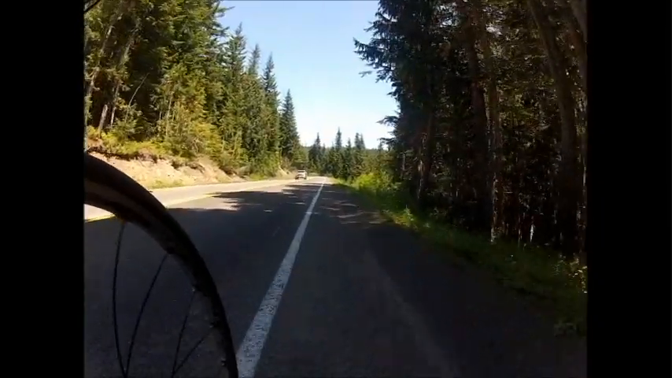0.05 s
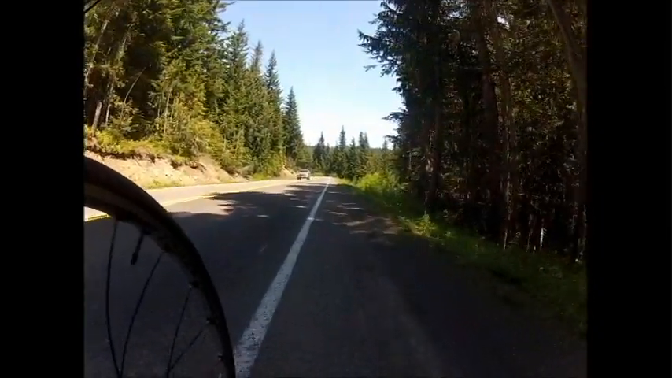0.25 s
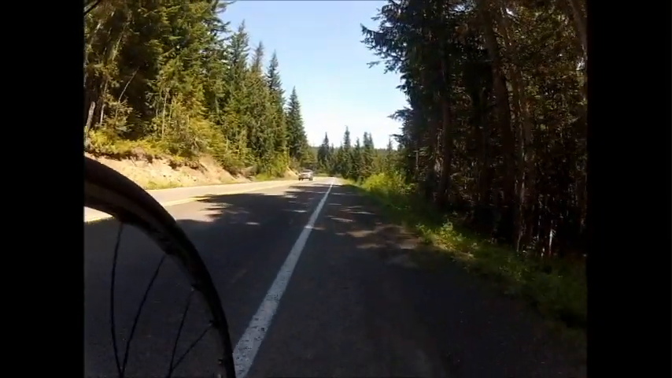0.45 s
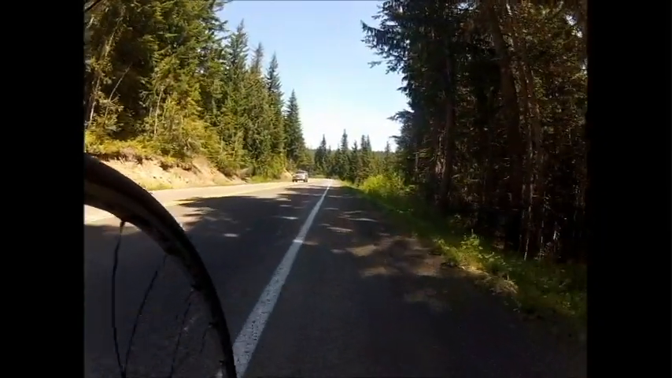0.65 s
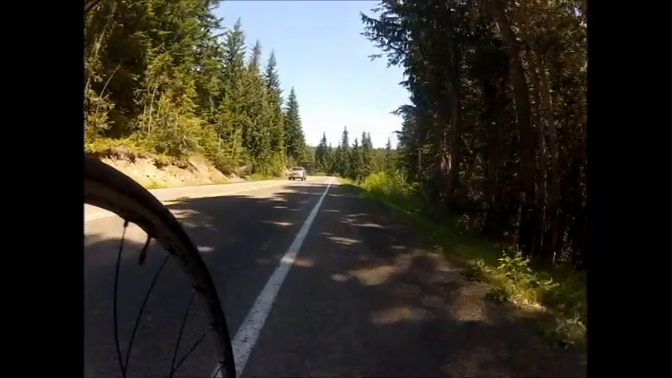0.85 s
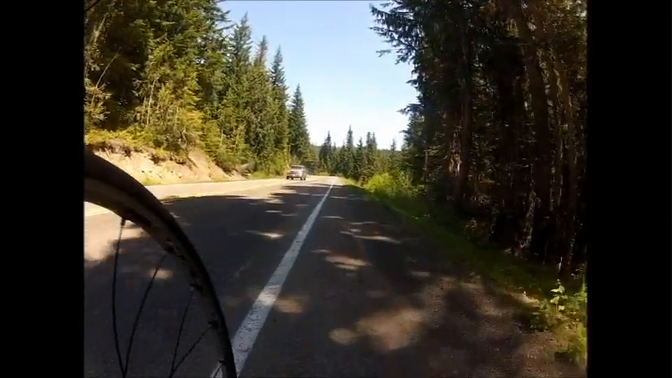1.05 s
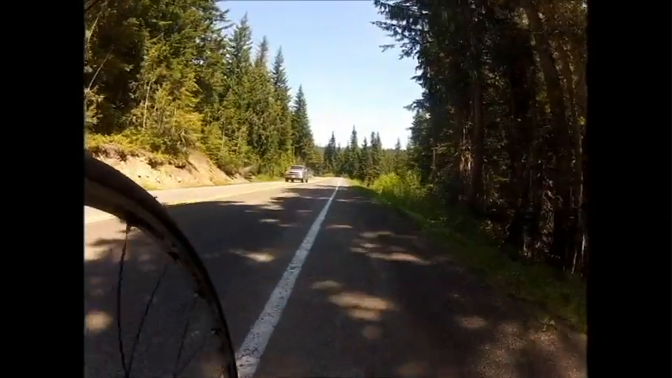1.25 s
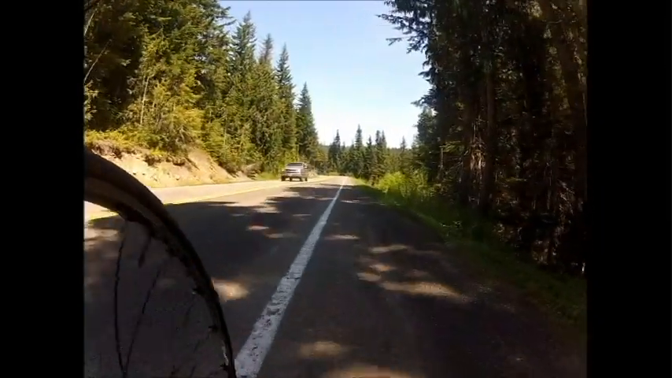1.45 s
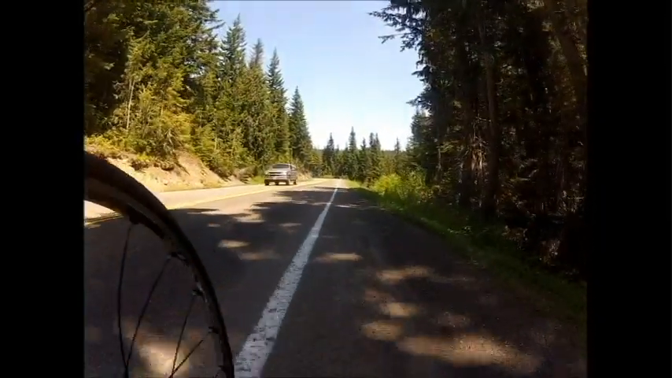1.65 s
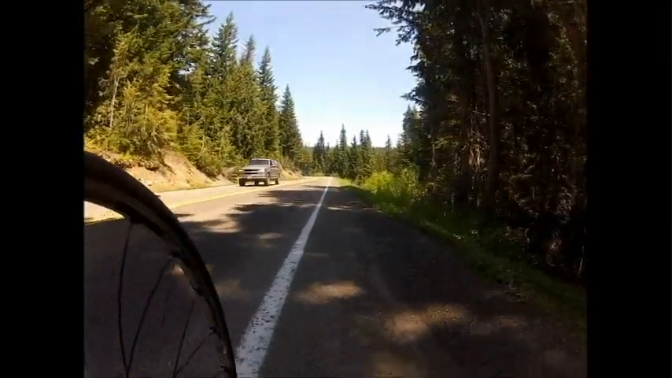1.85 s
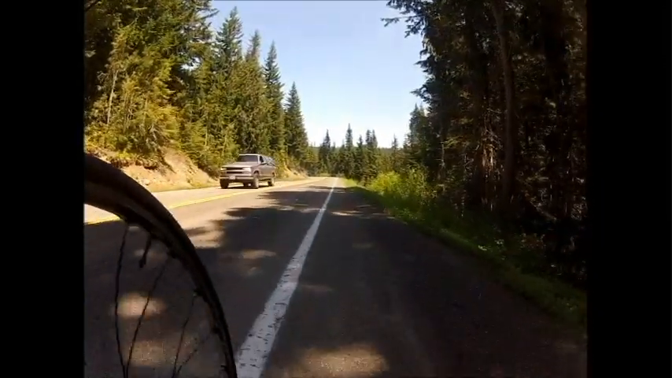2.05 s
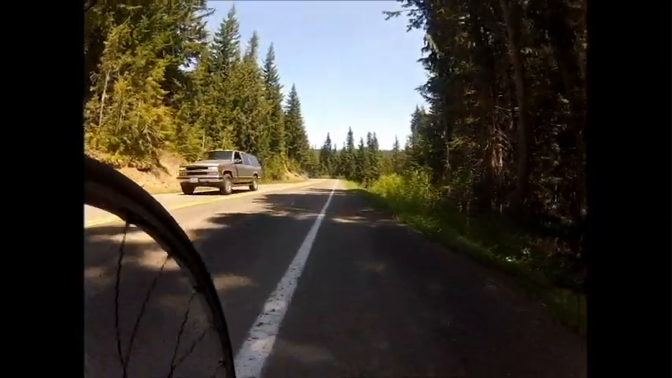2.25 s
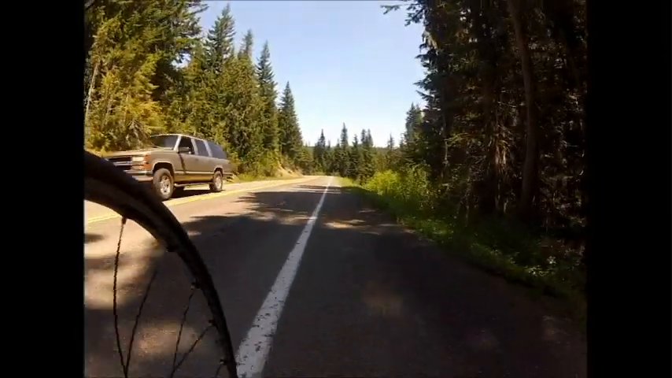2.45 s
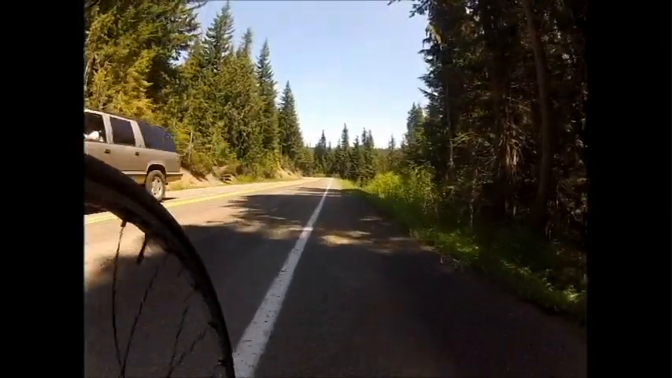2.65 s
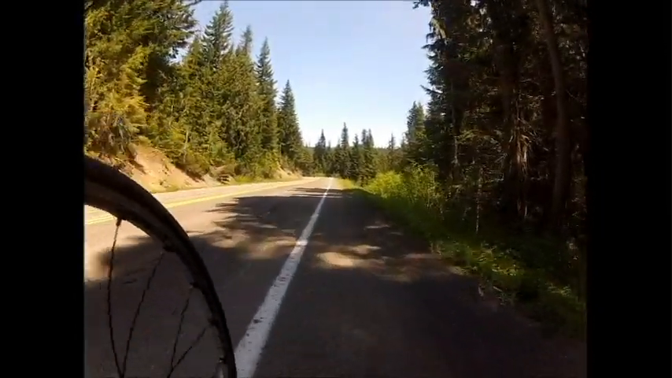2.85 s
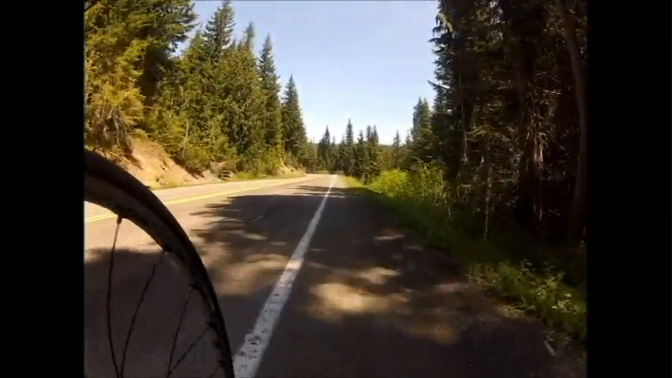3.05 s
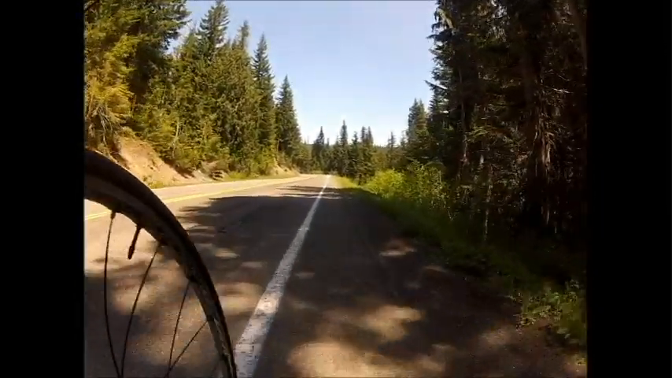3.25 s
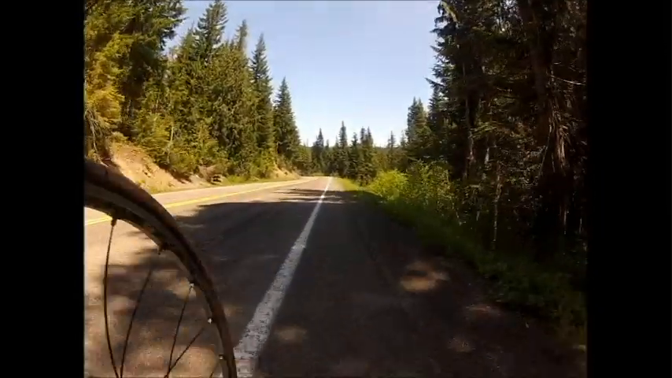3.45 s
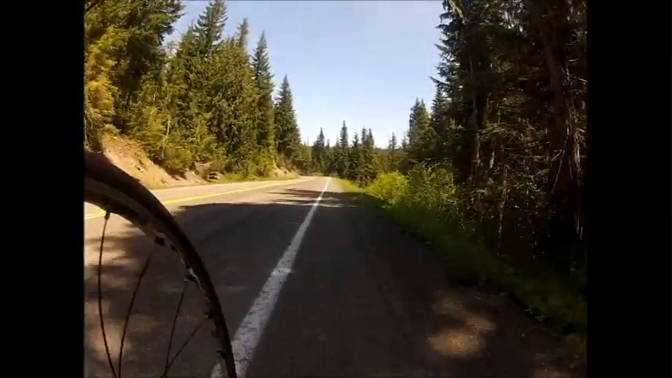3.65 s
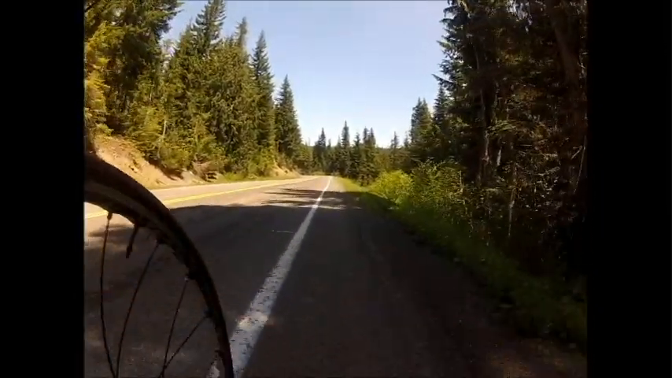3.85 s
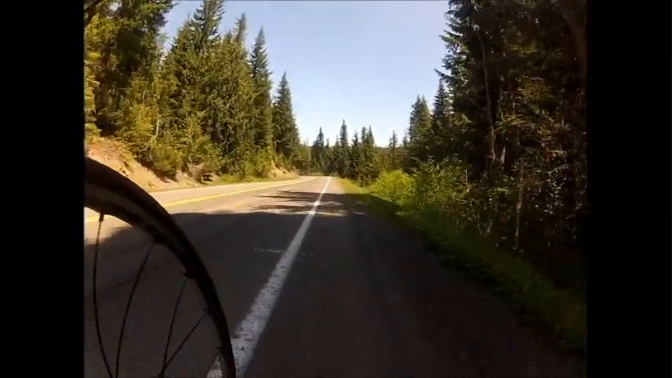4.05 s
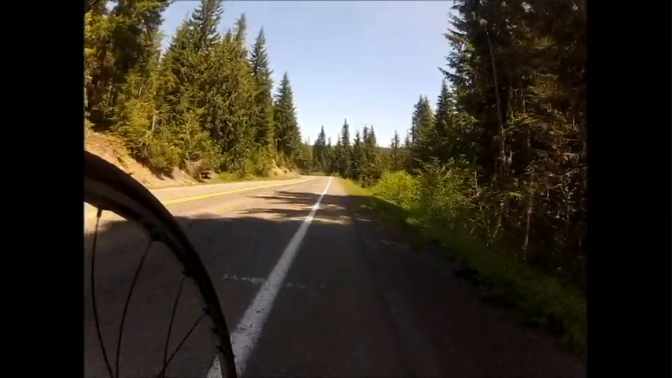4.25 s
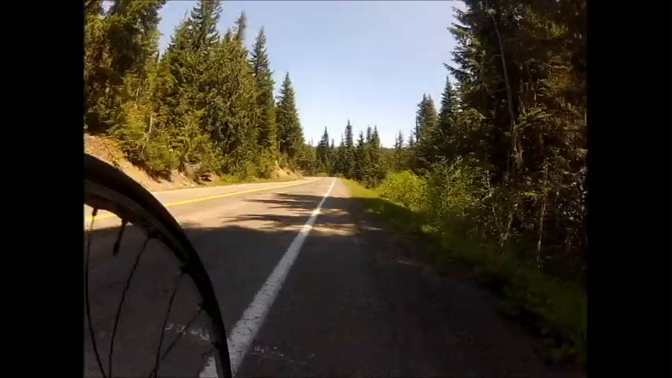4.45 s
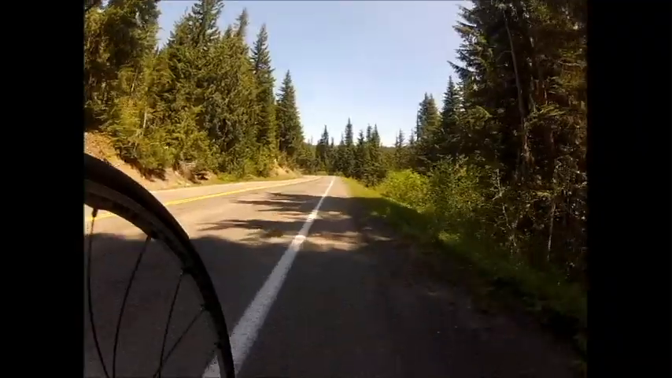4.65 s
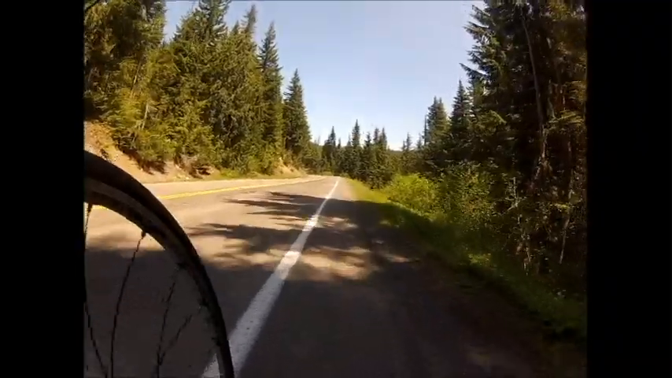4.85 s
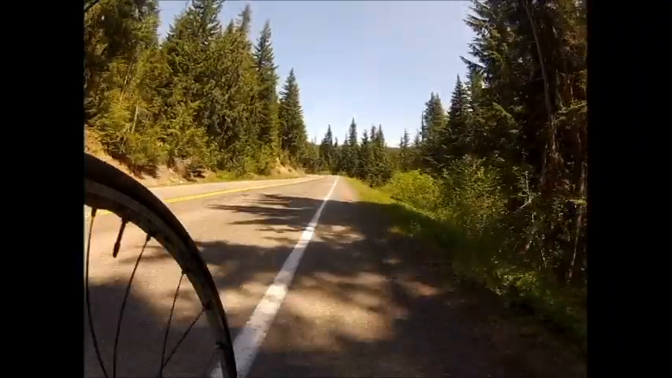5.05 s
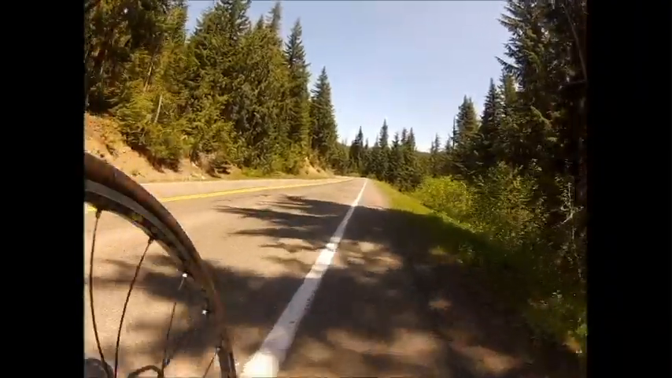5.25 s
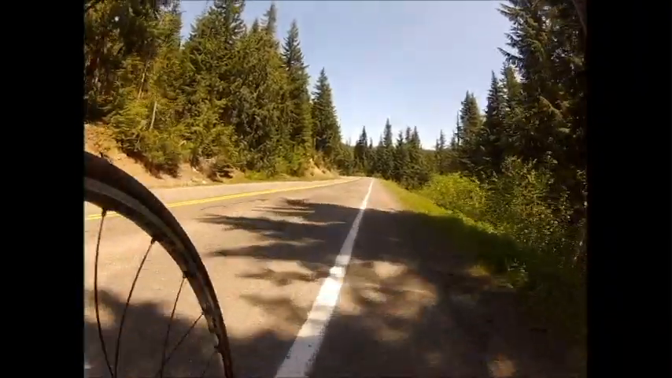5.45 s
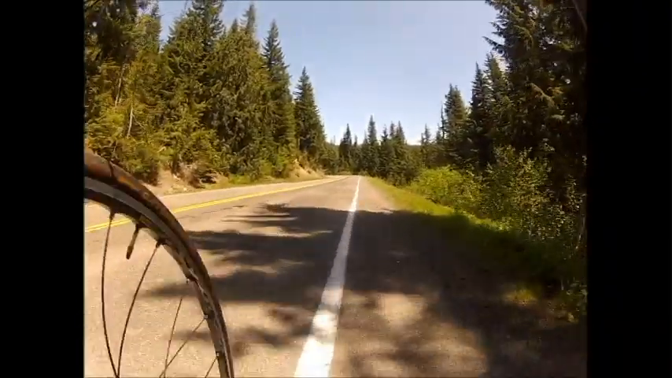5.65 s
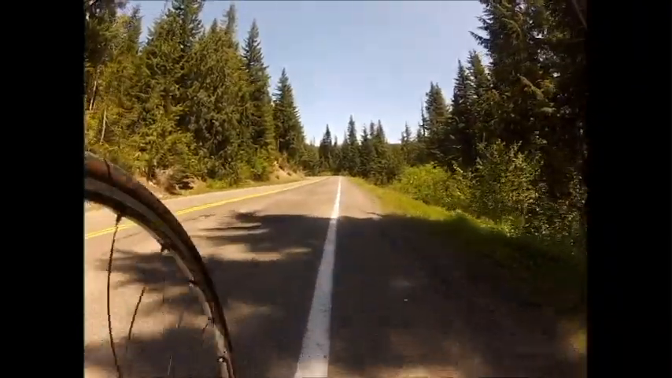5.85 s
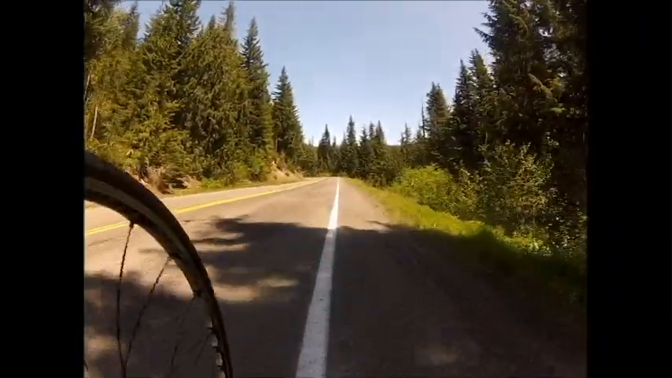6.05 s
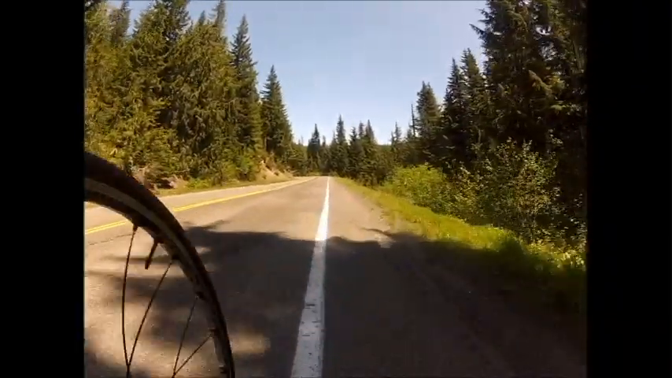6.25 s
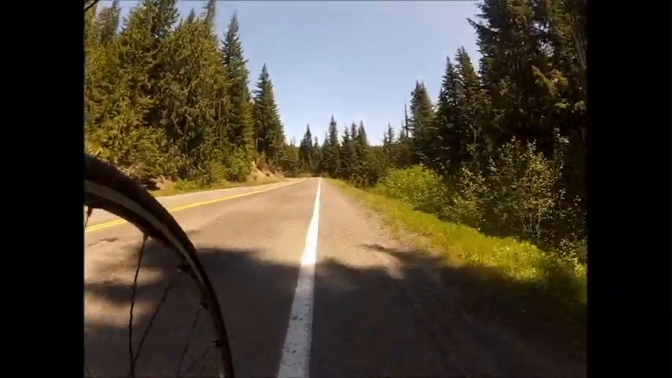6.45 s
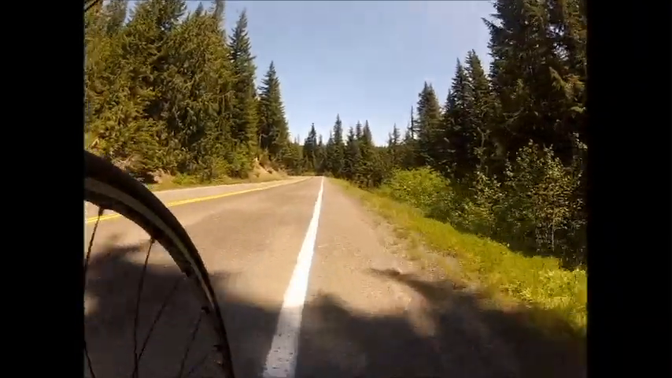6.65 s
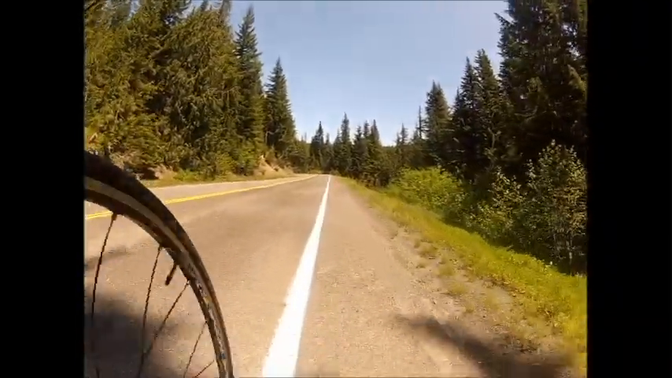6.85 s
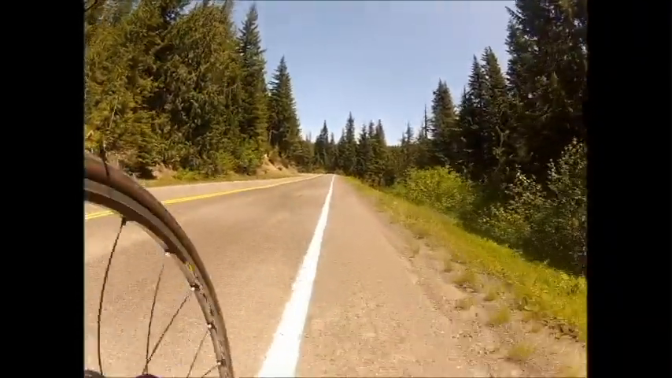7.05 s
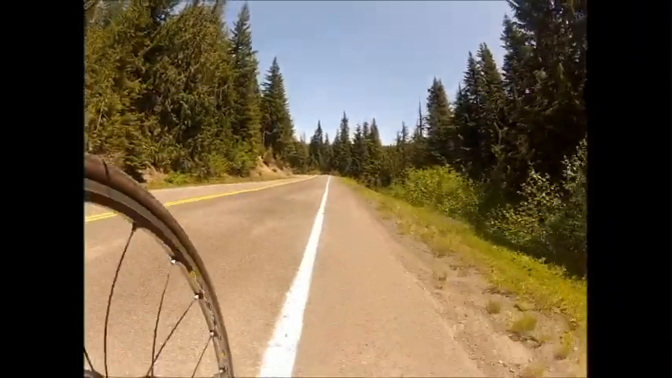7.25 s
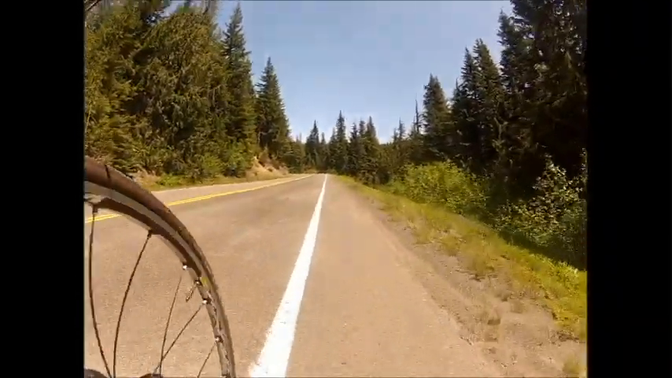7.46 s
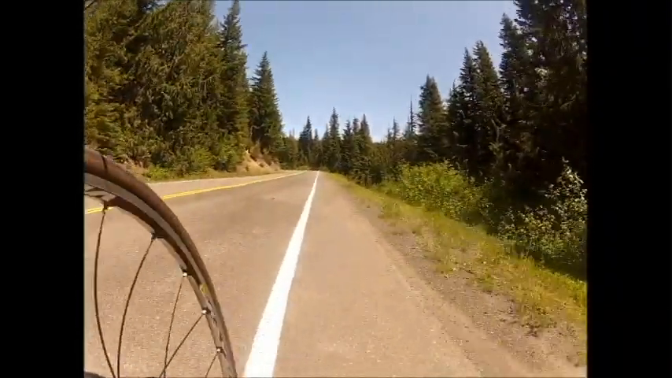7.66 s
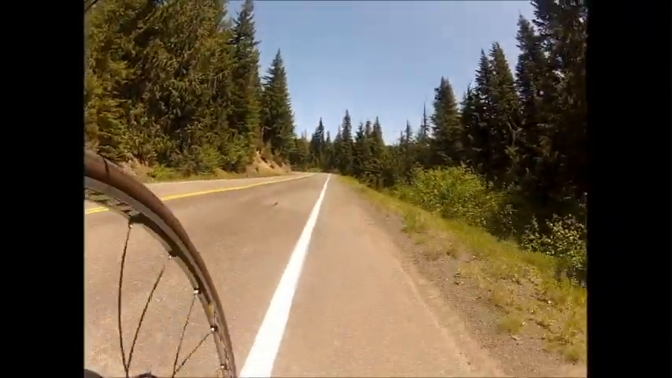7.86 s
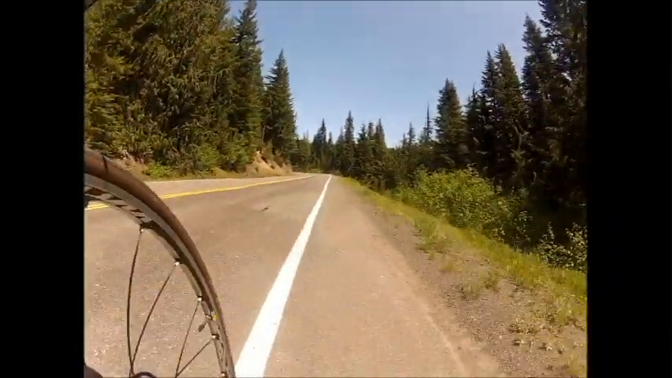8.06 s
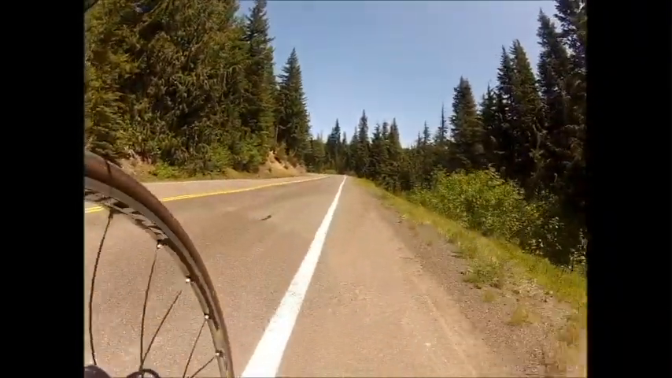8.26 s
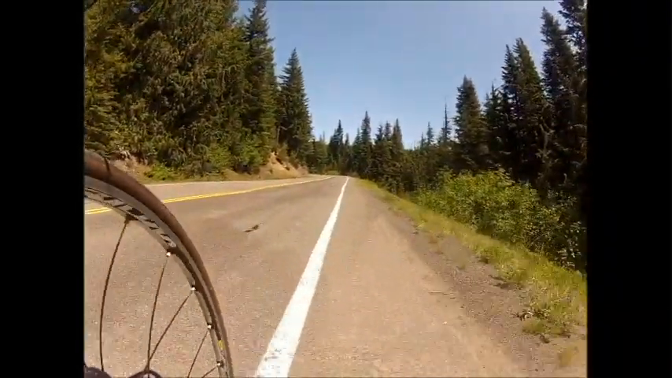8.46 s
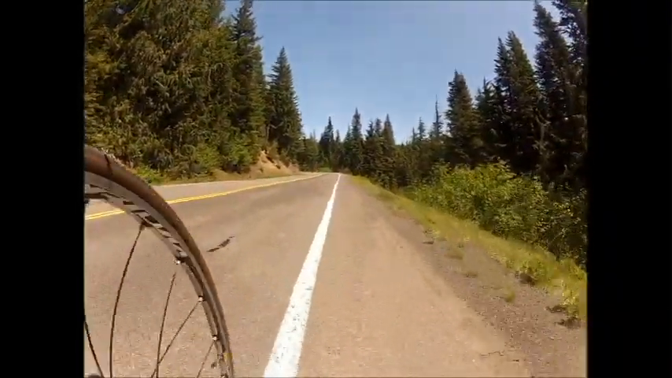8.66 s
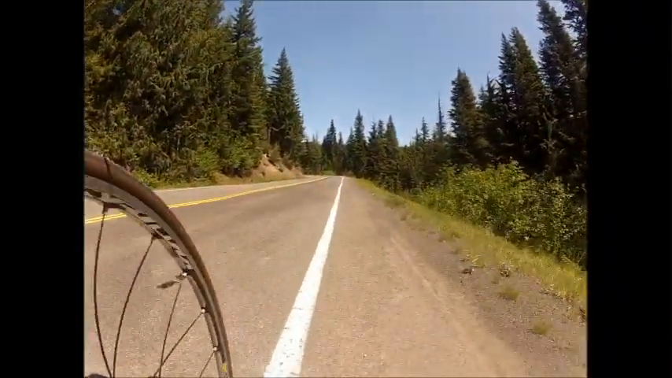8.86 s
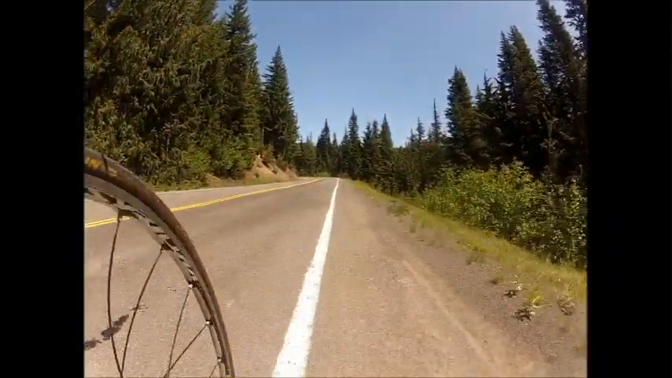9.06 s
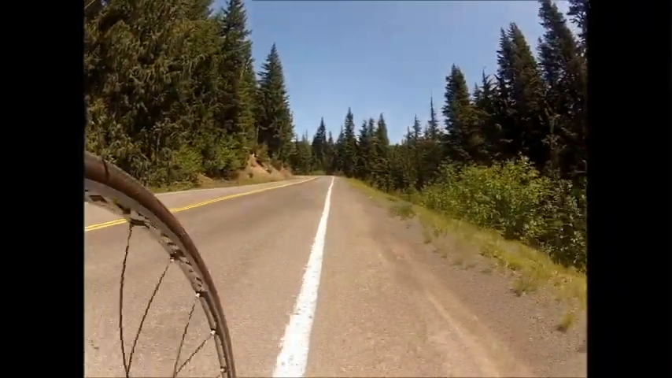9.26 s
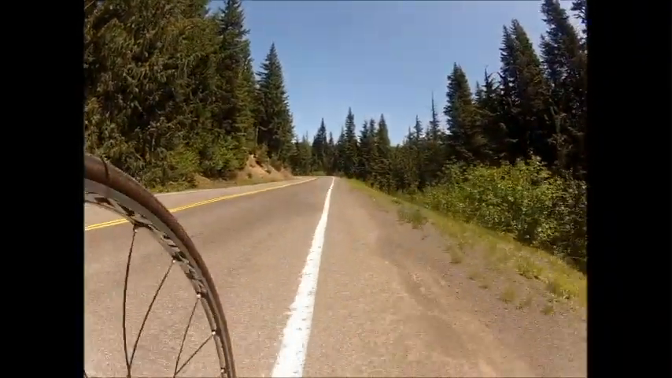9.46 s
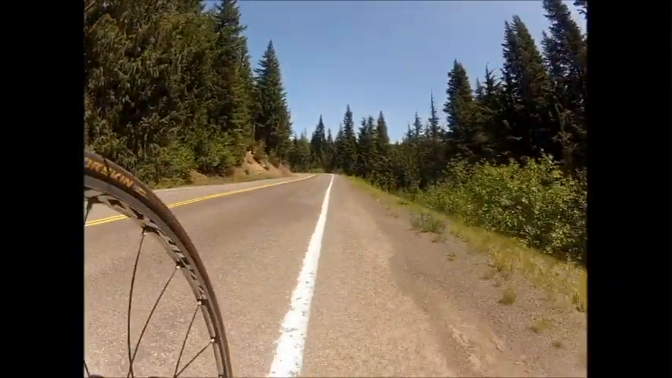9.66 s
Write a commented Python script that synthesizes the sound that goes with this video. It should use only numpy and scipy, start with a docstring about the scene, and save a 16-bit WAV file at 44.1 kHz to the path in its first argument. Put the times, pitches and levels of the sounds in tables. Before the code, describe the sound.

A bicycle rides over asphalt outdoors, heard through its own frame. Dull rumble and patter continue under loose metallic chatter, ticks and small clanks. First a car approaches, passes with a brief low whoosh and recedes. After a steadier stretch, a sharp triple jolt slams the bike, loudest in the middle, then quieter rolling and rattling resume. The tone is boxy, with a gritty treble edge.

```python
"""Bicycle climbing an asphalt road

Heard by one microphone in a closed case clamped to the frame. Noise through resonances makes the frame hum;
shaped noise makes the broad roar. Blows excite short tones and noise bursts in the case, loose parts and mount.
A car passes the other way as distance-faded noise with Doppler-shifted peaks, and a thin rub chirrs once.
A coarse sampler holds each sample, so the whole sound is mirrored into the treble."""
import sys
import numpy as np
from scipy import signal
from scipy.fft import rfft, irfft, next_fast_len
from scipy.io import wavfile
from scipy.ndimage import map_coordinates

SR = 44100
rng = np.random.default_rng(int(sys.argv[2]) if len(sys.argv) > 2 else 0)


def int16_out(signal):
    """Quantize to a 16-bit WAV file."""
    q = np.round(np.clip(np.atleast_2d(signal).T, -1, 1) * 32767)
    wavfile.write(sys.argv[1], SR, q.astype(np.int16))


N = 427769

# Levels of the broad roar, which also swells around the passing car, and of the rattle.
# Each row: time in seconds, level of the roar in dB, level of the rattle in dB.
RIDE_LEVELS = [(0.0, -33.5, -45), (0.6, -38.5, -54.5), (1.4, -40, -52.5), (2.0, -35, -50.5),
               (3.0, -31.5, -49), (3.8, -35, -46), (4.5, -37, -46), (5.2, -39, -49.5), (5.8, -39, -52.5),
               (6.5, -40.5, -52.5), (7.3, -40, -55.5), (7.55, -35.5, -43.5), (7.94, -33, -43.5),
               (8.0, -38.5, -54), (8.45, -44.5, -58), (8.56, -40, -65), (8.62, -37.5, -51.5),
               (8.8, -39, -48), (9.1, -39.5, -49.5), (9.7, -40.5, -55.5)]


def road_roar():
    """Broadband excitation: shaped noise gives a wavering roar, and small blows a patter of knocks in the case."""
    # Spectral density of the roar. Each row: frequency in Hz, relative density in dB per Hz.
    roar_density = [(68, -33), (115, 2), (279, 2), (372, -3), (441, 3.5), (550, -5), (724, 2), (1300, -27),
                    (2060, -18.5), (2400, -29), (2600, -23), (3380, -23.5), (5720, -120)]
    roar = unit(rush(roar_density) * amp(1.96 * wobble(45)))
    case_modes = modes([(724, 56.0, -3.0), (511, 17.6, -6.5)])  # Hz, width Hz, dB
    small_knocks = bursts(chance(per_s=60, spread_db=2.0), t60=0.054)
    patter = unit(filtered(small_knocks, case_modes))
    roar_db = curves(RIDE_LEVELS)[0]
    return amp(roar_db) * (roar + amp(-6.0) * patter)


def frame_hum():
    """Forced resonance: noise excites the low modes of the frame."""
    # Frame modes. Each row: frequency in Hz, width in Hz, relative level in dB.
    frame_modes = [(24, 19, -10.5), (63.3, 14.6, 0.5)]
    # Loudness of the hum. Each row: time in seconds, level in dB.
    hum_levels = [(0.0, -37), (0.25, -32), (1.7, -33), (2.4, -35.5), (3.3, -32.5), (4.6, -36.5), (5.5, -35),
                  (6.9, -37.5), (7.6, -33.5), (8.05, -37), (8.4, -42), (9.1, -33), (9.7, -41)]
    waver_db = 1.5  # scale of the random swell

    def response(f):
        return modes(frame_modes)(f) * modes([(42, 60, 0)])(f)

    hum = unit(filtered(rng.standard_normal(N), response))
    return amp(curves(hum_levels)[0] + waver_db * wobble(6)) * hum


def case_knocks():
    """Impulse response of a damped mode: each knock makes the case ring as a tone that swells and dies."""
    # Knocks on the case. Each row: start in seconds, peak level in dB, pitch in Hz.
    knocks = [(0.094, -24, 700), (0.335, -25.5, 760), (0.394, -26.5, 686), (1.217, -21, 697),
              (1.302, -22, 670), (1.939, -21, 690), (2.003, -23.5, 703), (2.079, -17.5, 697),
              (2.122, -22, 517), (4.146, -22.5, 746), (4.34, -19, 695), (4.463, -23, 740),
              (4.724, -26, 690), (4.938, -19.5, 704), (5.052, -18, 708), (5.142, -24, 707),
              (5.439, -27, 690), (5.467, -27, 720), (5.491, -25.5, 720), (5.779, -22, 700),
              (7.474, -21, 720), (7.506, -23, 703), (7.555, -10, 680), (7.593, -25, 650), (7.61, -14, 695),
              (7.6305, 0.5, 547), (7.736, -20, 660), (7.782, -22, 700), (7.823, -11, 534),
              (7.858, -15.5, 680), (7.889, -20, 665), (7.93, -25.5, 690), (7.96, -29, 690),
              (8.301, -25, 695), (8.35, -32.5, 690), (8.595, -22, 682), (8.793, -24, 733),
              (8.839, -25.5, 716), (8.915, -24, 694), (9.032, -24.5, 725), (9.222, -21, 660)]
    swell_s, quicker_per_db = 0.0043, 0.09  # a knock of -21.5 dB peaks after swell_s; harder ones are quicker
    out = np.zeros(N + SR)
    t = np.arange(SR // 10) / SR
    for s, db, hz in knocks:
        u = t / swell_s * np.exp(quicker_per_db * (db + 21.5))
        swell = (u * np.exp(1 - u)) ** 2
        drift = 0.061 * np.cumsum(rng.standard_normal(len(t)))  # phase noise roughens the tone
        tone = np.sin(2 * np.pi * (hz * t + rng.random()) + drift)
        out[round(s * SR):][:len(t)] += amp(db) * swell * tone
    return out[:N]


def crunch():
    """Shock excitation: hard road bumps crunch through everything as dying bursts of shaped noise."""
    # Road bumps. Each row: start in seconds, strength of the blow in dB.
    jolts = [(7.5484, -14), (7.6313, -2), (7.8193, -15)]
    # Spectral density of the crunch. Each row: frequency in Hz, relative density in dB per Hz.
    crunch_density = [(65, -26), (110, 8), (340, -9.5), (641, 8.5), (1240, -13), (2130, -5.5), (3200, -21),
                      (4160, -53), (7040, -120)]
    bumps = np.zeros(N)
    for s, db in jolts:
        bumps[round(s * SR)] = amp(db)
    return filtered(bursts(bumps, t60=0.027), spectrum(crunch_density))


def rattles():
    """Impact excitation: loose parts ring under loud hits at set times and a dense, clumped random chatter."""
    # Sharp hits of a loose part. Each row: start in seconds, strength of the blow on the dull part in dB,
    # strength of the blow on the bright part relative to it in dB.
    ticks = [(0.056, -37, -2), (0.1223, -33.5, 1), (0.1865, -30.5, -1), (0.3368, -31.5, 0),
             (0.419, -42, -6), (0.566, -30, -6), (0.673, -36, 1), (0.7734, -34, -1), (0.8115, -32.5, -3),
             (0.8895, -36.5, -1), (1.1118, -37.5, 1), (1.1838, -33, -1), (1.194, -32.5, 1),
             (1.2123, -35, 3), (1.534, -40, -5), (1.8375, -35.5, -2), (1.898, -34.5, 5.5), (1.924, -34, -6),
             (1.981, -33, -5), (1.9986, -36, -5), (2.0217, -34, -1), (2.0518, -35, -2), (2.081, -36, -6),
             (2.1212, -21.5, -1), (2.2485, -32, -5), (2.371, -31, -3), (2.4406, -30.5, 4),
             (2.7471, -27, 2.5), (3.072, -36.5, -3), (3.1012, -32, -6), (3.1503, -33.5, -6),
             (3.1749, -35, -1), (3.1996, -31, 4.5), (3.4498, -35, -2), (3.4811, -34.5, 1),
             (3.5232, -30.5, 0), (3.7422, -35, -10), (3.8473, -35, -1), (3.8697, -31, -7),
             (4.128, -35.5, 0), (4.194, -34.5, 1), (4.3917, -28, -3), (4.4097, -30.5, -6), (4.849, -32, 1),
             (4.9205, -40, -7), (4.9755, -36, -9), (4.993, -36, -2), (5.135, -26, 7), (5.4369, -26.5, 1.5),
             (5.4654, -30.5, -4), (5.499, -32, -1), (5.6402, -39, -3), (5.7754, -24, 5.5), (6.097, -33, -2),
             (6.164, -28.5, 2), (6.351, -38, 2), (6.6988, -36.5, -1), (6.7227, -30, -7),
             (7.4688, -32.5, -9), (7.509, -30.5, -5), (7.546, -24, -3), (7.552, -20.5, -7),
             (7.559, -32, -7), (7.5779, -28, -6), (7.59, -31, -1), (7.6287, -12.5, -4), (7.6544, -34, -1),
             (7.7046, -37, 4), (7.792, -31, -8), (7.8196, -12, -9), (7.853, -36, 0), (7.9252, -33, 7),
             (8.2979, -29, 5.5), (8.5917, -25, -1.5), (8.628, -33, -5), (8.728, -30, -1), (8.7993, -34, -9),
             (8.8414, -33, -4), (8.86, -32.5, 1), (8.8872, -33.5, 2), (9.0283, -31, 1), (9.0685, -35, 4),
             (9.2203, -23.5, -3), (9.459, -28.5, 1.5), (9.6644, -36.5, -1)]
    # Modes of the dull part. Each row: frequency in Hz, width in Hz, relative level in dB.
    dull_modes = [(2063, 300, -3), (3020, 230, 1.5), (3600, 700, 1.5), (4200, 380, -1)]
    # Modes of the bright part. Each row: frequency in Hz, width in Hz, relative level in dB.
    bright_modes = [(2807, 79, -5), (4665, 190, -6.5), (5547, 260, -3)]
    dull_hits, bright_hits = np.zeros(N), np.zeros(N)
    for s, db, bright_db in ticks:
        dull_hits[round(s * SR)] = amp(db)
        bright_hits[round(s * SR)] = amp(db + bright_db)

    chatter_db = shaking()
    clumps = amp(3.8 * wobble(14))
    small_hits = unit(bursts(clumps * chance(per_s=150, spread_db=3.0), t60=0.01))
    hiss = amp(-13.0) * rng.standard_normal(N)
    chatter = amp(chatter_db) * (small_hits + hiss)

    dull = filtered(bursts(dull_hits, t60=0.016) + chatter, modes(dull_modes))
    bright = filtered(bursts(bright_hits, t60=0.015) + amp(-2.5) * chatter, modes(bright_modes))
    return dull + bright


def mount():
    """Damped vibration: each clank of the mount is a rough ring near its own pitch, over many small chinks."""
    # Clanks of the mount. Each row: start in seconds, level in dB ahead of the envelope, pitch in Hz.
    clanks = [(0.3691, -26.5, 1850), (0.788, -30.5, 1660), (1.5316, -33, 1600), (2.0183, -26, 1600),
              (3.607, -27, 1650), (4.1475, -31.5, 1950), (4.322, -26, 1950), (4.364, -26.5, 1680),
              (4.462, -25, 1860), (4.6807, -33, 1790), (4.7533, -30, 1640), (5.133, -33, 1700),
              (5.1684, -25, 1660), (5.54, -24.5, 1640), (5.8153, -29.5, 1720), (5.8591, -27, 1690),
              (6.1634, -34, 1900), (6.8824, -26.5, 1720), (7.201, -32, 1710), (7.394, -30, 1620),
              (7.555, -14.5, 1720), (7.591, -19, 1590), (7.6311, -16, 2150), (7.788, -29, 1620),
              (7.8202, -10, 1780), (7.8546, -23, 1640), (7.894, -25.5, 1580), (7.944, -27, 1640),
              (8.017, -32, 1600), (8.0745, -35, 2070), (8.297, -32, 1810), (8.589, -29.5, 1770),
              (8.675, -27.5, 1810), (8.7232, -25, 1580), (8.795, -27, 1670)]
    out = np.zeros(N + SR)
    t = np.arange(SR // 20) / SR
    envelope = (1 - np.exp(-t / 0.001)) * amp(-60 * t / 0.025)  # 1 ms rise, 60 dB fall in 25 ms
    for s, db, hz in clanks:
        drift = 0.17 * np.cumsum(rng.standard_normal(len(t)))  # phase noise roughens the ring
        out[round(s * SR):][:len(t)] += amp(db) * envelope * np.sin(2 * np.pi * hz * t + drift)

    mount_modes = modes([(1136, 85, -4.0), (1624, 95, -2), (1980, 450, -11.0)])  # Hz, width Hz, dB
    small_hits = bursts(chance(per_s=71, spread_db=-2.5), t60=0.025)
    chinks = unit(filtered(small_hits, mount_modes))
    return out[:N] + amp(shaking() - 3.0) * chinks


def shaking():
    """Periodic modulation: the rattle level in dB follows its curve and swells once for each wheel turn."""
    wheel_s, wheel_hz, speedup_hz_per_s = 0.46, 2.49, 0.121  # a turn starts; turns a second then; their gain
    wheel_db = 0.5  # swing either way
    t = np.arange(N) / SR - wheel_s
    turns = wheel_hz * t + speedup_hz_per_s * t ** 2 / 2
    return curves(RIDE_LEVELS)[1] + wheel_db * np.cos(2 * np.pi * turns)


def scrape():
    """Friction noise: a short, thin rub flutters through a high resonance and a weaker lower one."""
    full_s, hold_s, edge_s, rub_db = 4.545, 0.05, 0.011, -45  # full level from, hold, fade at each end
    t = np.arange(N) / SR - full_s
    stroke = np.clip(np.minimum(t + edge_s, hold_s + edge_s - t) / edge_s, 0, 1)
    rub_modes = modes([(2350, 250, -3), (4790, 230, 0)])  # Hz, width Hz, dB
    flutter = amp(rub_db + 3.0 * wobble(120))
    return stroke * flutter * unit(filtered(rng.standard_normal(N), rub_modes))


def car():
    """Doppler effect and distance loss: drone and tyre roar swell and fade, their narrow peaks drop in pitch."""
    # Spectral density of the engine drone. Each row: frequency in Hz, relative density in dB per Hz.
    drone_density = [(60, -41), (100, -7), (125, -6), (230, 1), (320, -13), (430, -54), (700, -120)]
    # Spectral density of the tyre roar. Each row: frequency in Hz, relative density in dB per Hz.
    tyre_density = [(180, -37), (300, -7), (393, -7), (468, -3.5), (634, -8), (795, -7.5), (1130, -25),
                    (1470, -32.5), (2400, -49), (3120, -64), (5280, -120)]
    pass_s, closing_m_per_s, gap_m, sound_m_per_s = 2.9, 27, 8, 343  # pass_s and gap_m: engine nearest
    axles_m = 2  # the tyres sound from this far behind the engine
    drone_db, tyres_db = -21.5, -21.5  # at the nearest distance, the drone ahead of its shading
    drone_fall_db, tyres_fall_db = 26, 23.5  # loss for ten times the distance
    shade_db = 2  # the body gradually hides the engine as it passes
    drone_hz, song_hz = 212.7, 641  # narrow peaks of engine and tyres without Doppler shift

    along_m = closing_m_per_s * (np.arange(N) / SR - pass_s) - np.array([[0], [axles_m]])
    metres = np.hypot(gap_m, along_m)
    receding = along_m / metres  # -1 approaching, 1 going away
    doppler = 1 / (1 + closing_m_per_s * receding / sound_m_per_s)
    far = np.log10(metres / gap_m)

    drone = unit(rush(drone_density) + 0.47 * fuzzy(drone_hz * doppler[0], width_hz=30))
    tyres = unit(rush(tyre_density) + 0.43 * fuzzy(song_hz * doppler[1], width_hz=90))
    shade = shade_db * (1 + receding[0]) / 2
    drone_gain = amp(drone_db - drone_fall_db * far[0] - shade)
    tyre_gain = amp(tyres_db - tyres_fall_db * far[1])
    return drone_gain * drone + tyre_gain * tyres


def amp(db):
    """Logarithmic level: decibels to gain."""
    return 10 ** (np.asarray(db) / 20)


def unit(x):
    """Power normalization: scale to rms 1."""
    return x / np.sqrt(np.mean(x ** 2) + 1e-20)


def curves(rows):
    """Linear interpolation: one value per sample for each column after the time."""
    s, *cols = np.transpose(rows)
    return [np.interp(np.arange(N) / SR, s, c) for c in cols]


def wobble(rate):
    """Slow random modulation: a smooth curve through rate random knots a second."""
    knots = rng.standard_normal(int(N * rate / SR) + 4)
    return map_coordinates(knots, [np.arange(N) * rate / SR])


def filtered(x, response):
    """Linear filtering: x times a response of frequency, scaled to keep the power of white noise."""
    m = next_fast_len(N + SR // 2)  # zero padding leaves room for the tail
    h = response(np.fft.rfftfreq(m, 1 / SR))
    h = h / np.sqrt(np.mean(abs(h) ** 2))
    return irfft(rfft(x, m) * h, m)[:N]


def modes(table):
    """Modal superposition: causal response of resonances (Hz, width Hz, dB) with alternating sign."""
    def response(f):
        total = 0
        for k, (c, w, db) in enumerate(table):
            total = total + (-1) ** k * amp(db) * 1j * f * w / (c * c - f * f + 1j * f * w)
        return total
    return response


def spectrum(points):
    """Spectral envelope: (Hz, dB) points joined on a log axis."""
    hz, db = np.transpose(points)
    return lambda f: amp(np.interp(np.log(f + 1), np.log(hz + 1), db))


def rush(points):
    """Spectral shaping: noise of rms 1 with the given spectrum."""
    return unit(filtered(rng.standard_normal(N), spectrum(points)))


def fuzzy(hz, width_hz):
    """Quadrature modulation: a narrow band of noise follows a moving centre."""
    turn = 2 * np.pi * np.cumsum(hz) / SR
    return unit(wobble(width_hz) * np.cos(turn) + wobble(width_hz) * np.sin(turn))


def bursts(blows, t60):
    """Exponential decay: each blow starts a puff of noise that falls 60 dB in t60 seconds."""
    fade = amp(-60 / (t60 * SR))
    return signal.lfilter([1], [1, -fade], blows) * rng.standard_normal(N)


def chance(per_s, spread_db):
    """Random arrivals: blows of overall rms 1 whose levels in dB spread exponentially up to a limit."""
    size = np.minimum(rng.exponential(size=N), 2.5)
    return unit((rng.random(N) < per_s / SR) * amp(spread_db * size))


def scene():
    """Superposition: all sources add at one microphone, which feeds both channels."""
    bicycle = road_roar() + frame_hum() + case_knocks() + crunch() + rattles() + mount() + scrape()
    return np.tile(bicycle + car(), (2, 1))


def record(dry):
    """Zero-order hold: band-limit, sample coarsely, clip and hold, which leaves mirror images in the treble."""
    hold_hz, top_hz = 12000, 15350  # coarse sampling rate; final low-pass
    hz = np.fft.rfftfreq(N, 1 / SR)
    dry = irfft(rfft(dry) / np.sqrt(1 + (hz / 5550) ** 28), N)  # filter ahead of the sampler
    coarse = np.clip(signal.resample(dry, round(N * hold_hz / SR), axis=1), -1, 1)
    stairs = np.roll(np.repeat(coarse, 4, axis=1), -2, axis=1)  # four steps, centred on the sample
    wet = signal.resample(stairs, N, axis=1)
    return np.clip(irfft(rfft(wet) / (1 + (hz / top_hz) ** 60), N), -1, 1)


dry = scene()
out = record(dry)
int16_out(out)
```